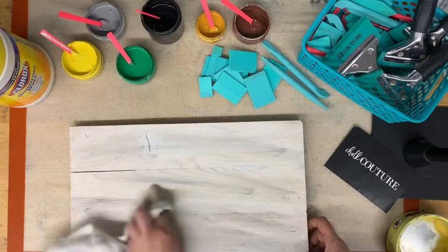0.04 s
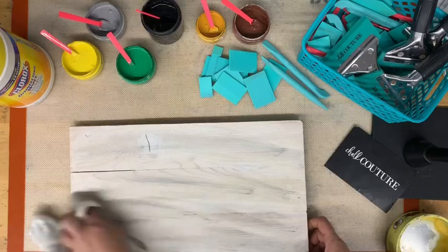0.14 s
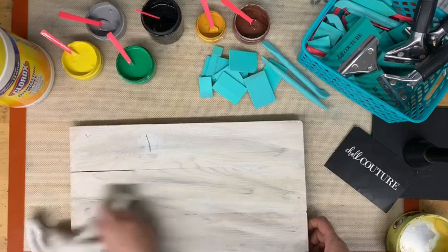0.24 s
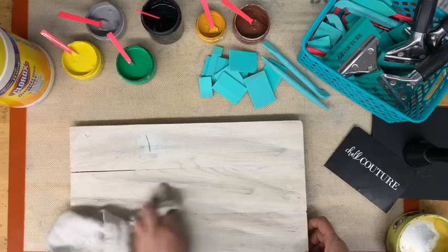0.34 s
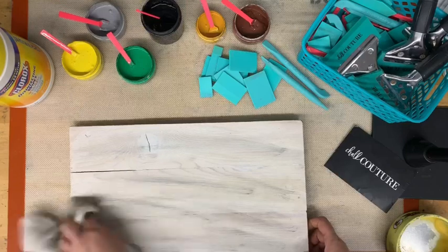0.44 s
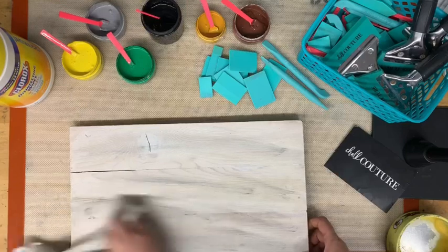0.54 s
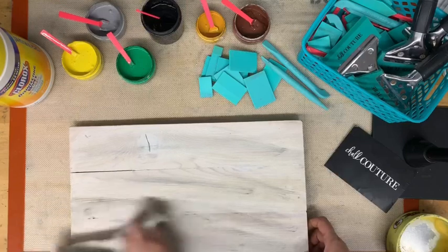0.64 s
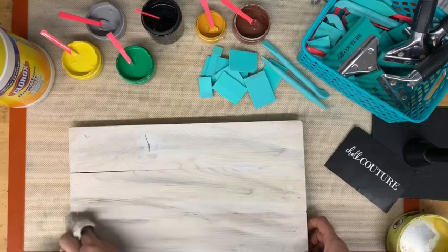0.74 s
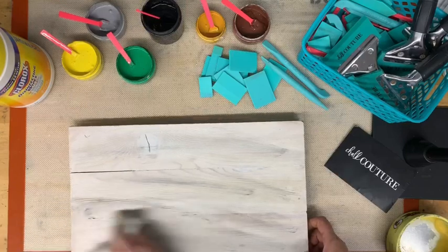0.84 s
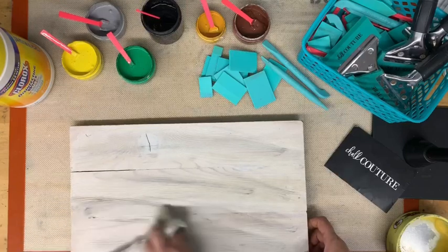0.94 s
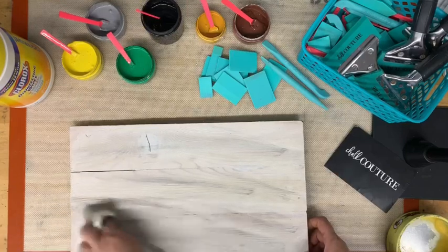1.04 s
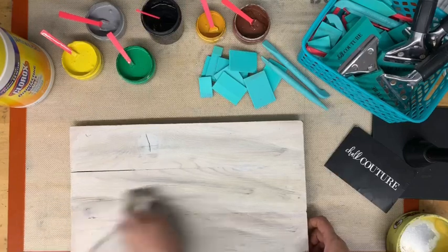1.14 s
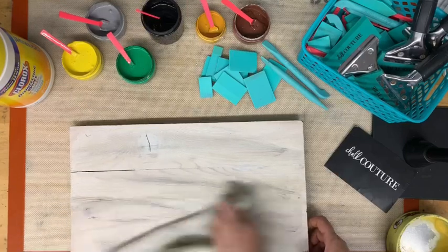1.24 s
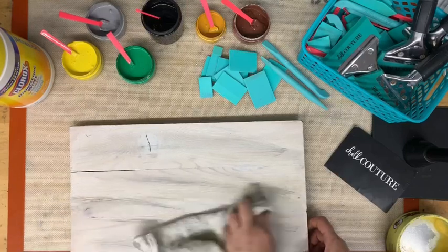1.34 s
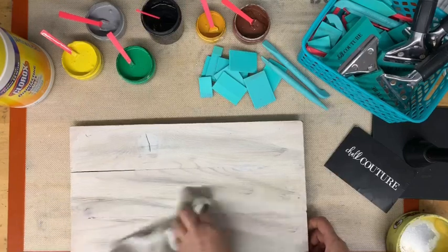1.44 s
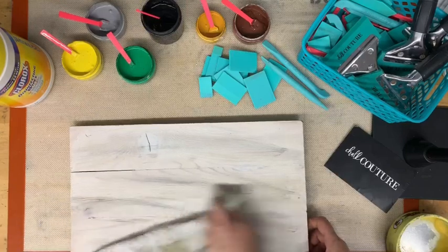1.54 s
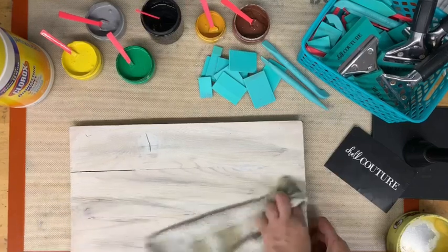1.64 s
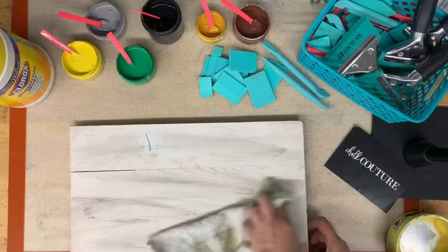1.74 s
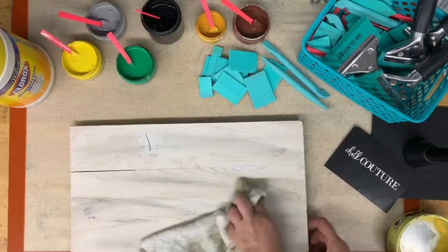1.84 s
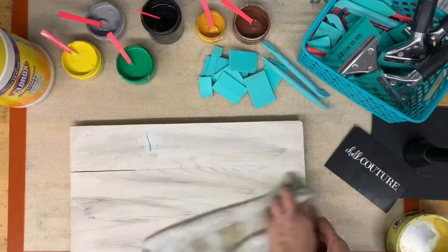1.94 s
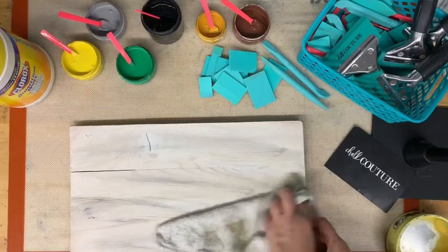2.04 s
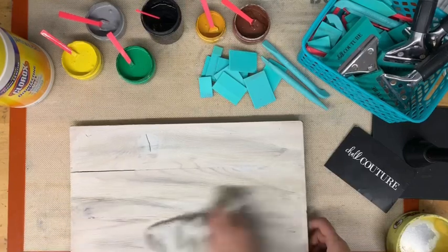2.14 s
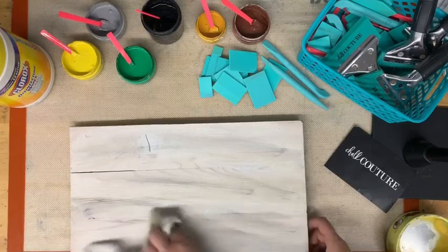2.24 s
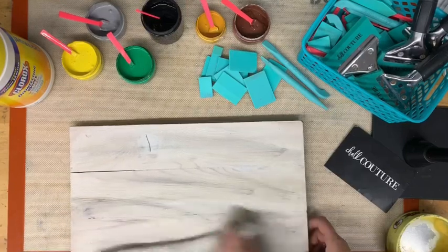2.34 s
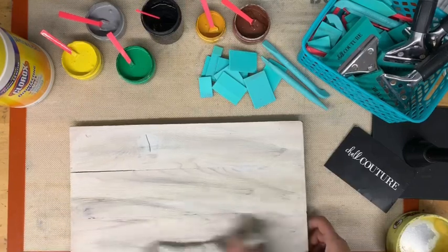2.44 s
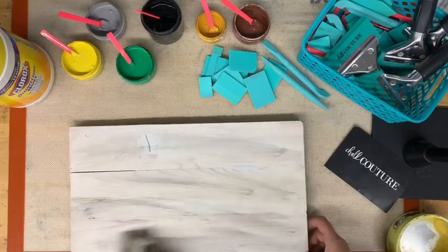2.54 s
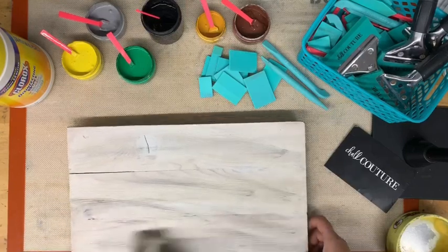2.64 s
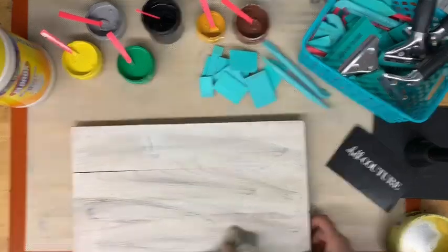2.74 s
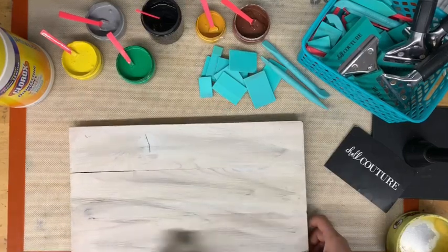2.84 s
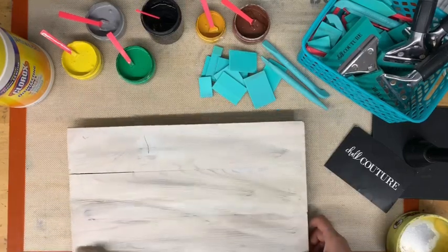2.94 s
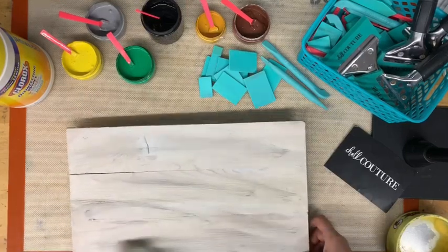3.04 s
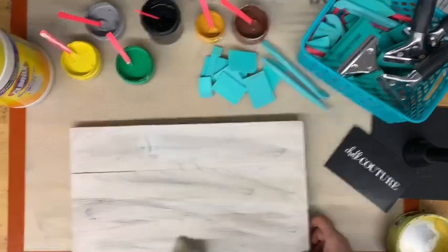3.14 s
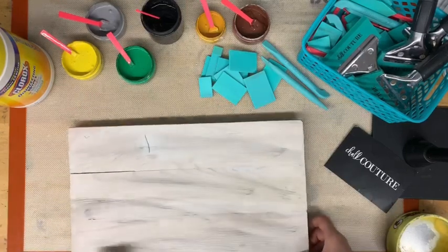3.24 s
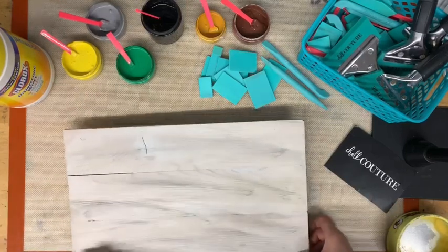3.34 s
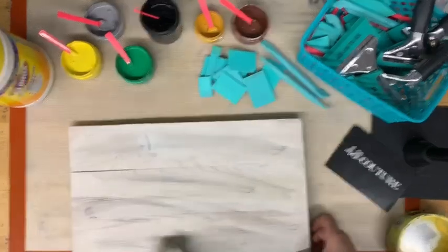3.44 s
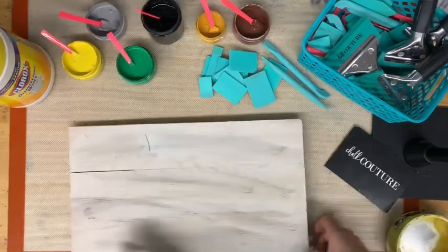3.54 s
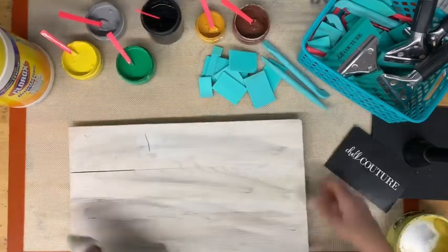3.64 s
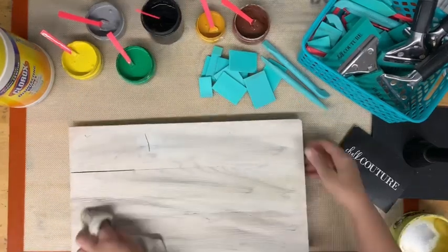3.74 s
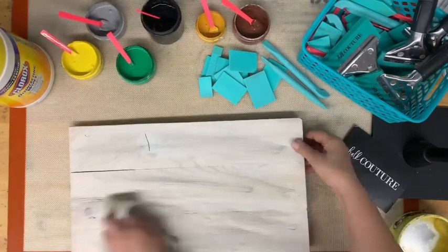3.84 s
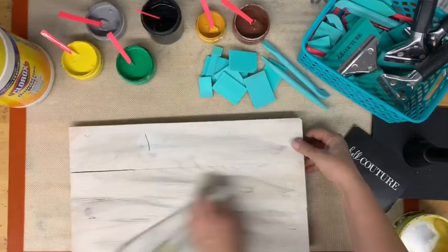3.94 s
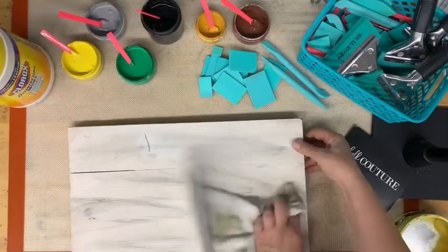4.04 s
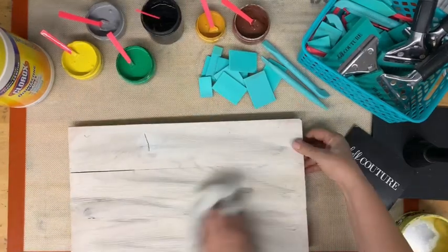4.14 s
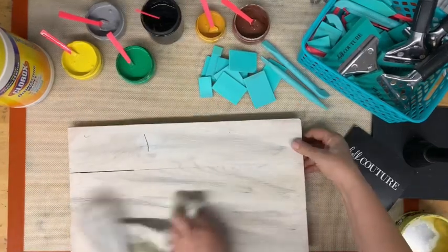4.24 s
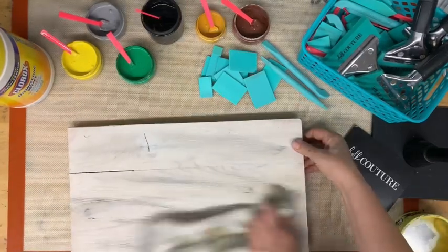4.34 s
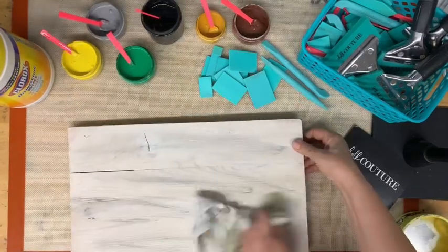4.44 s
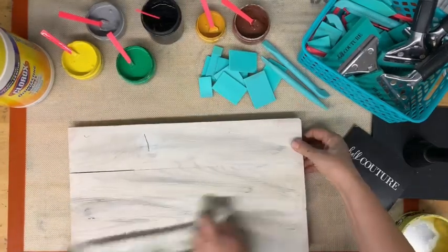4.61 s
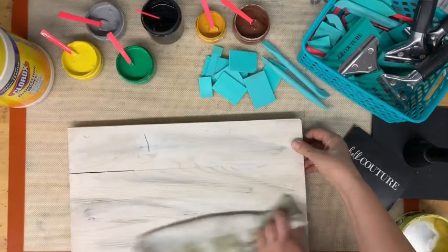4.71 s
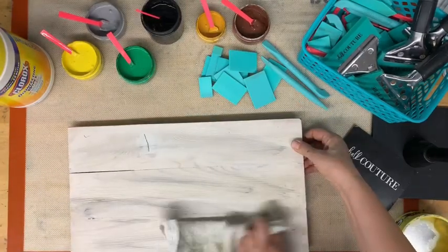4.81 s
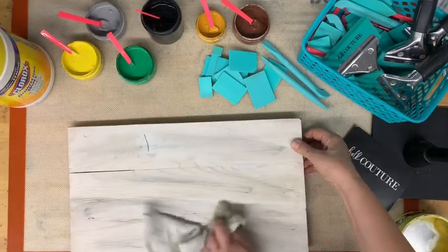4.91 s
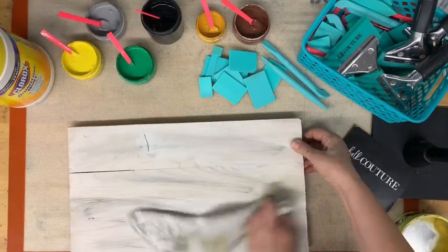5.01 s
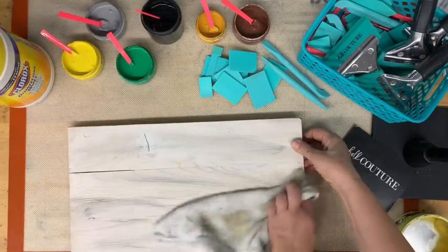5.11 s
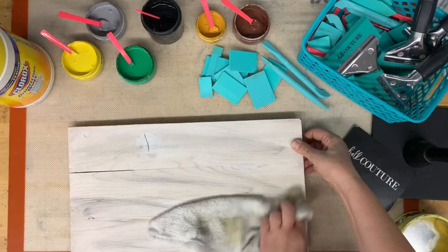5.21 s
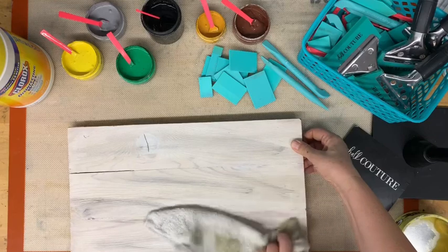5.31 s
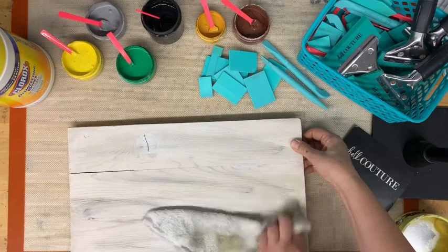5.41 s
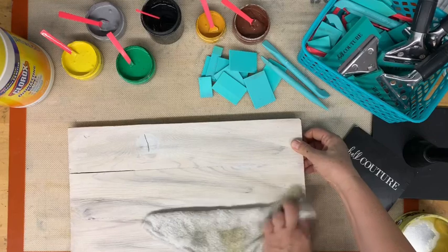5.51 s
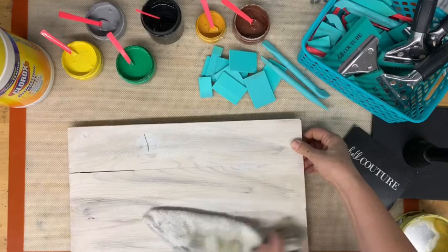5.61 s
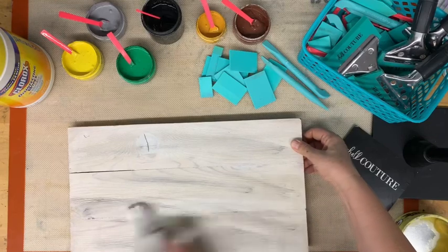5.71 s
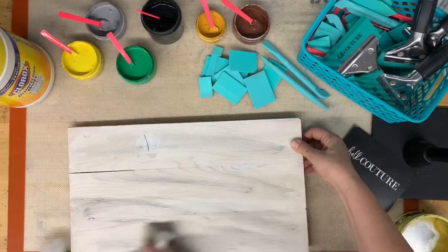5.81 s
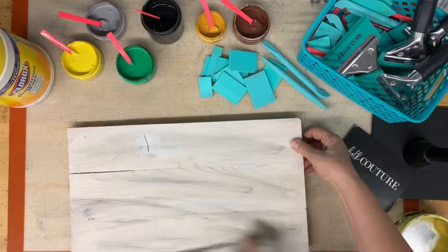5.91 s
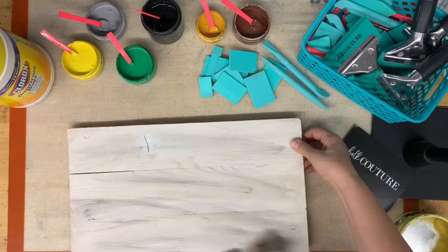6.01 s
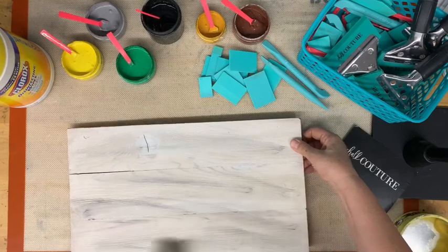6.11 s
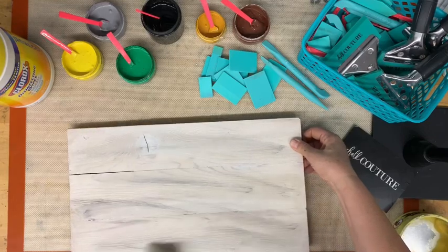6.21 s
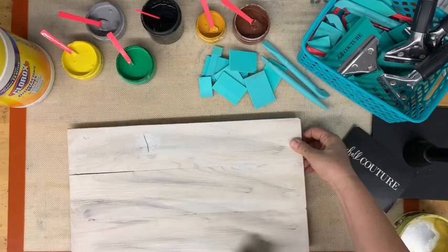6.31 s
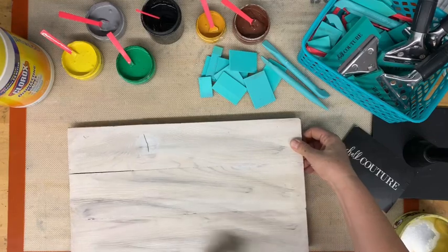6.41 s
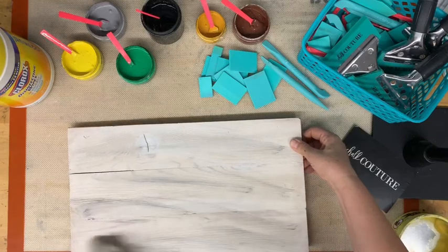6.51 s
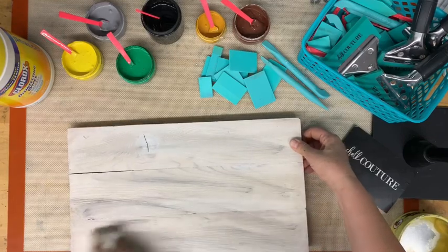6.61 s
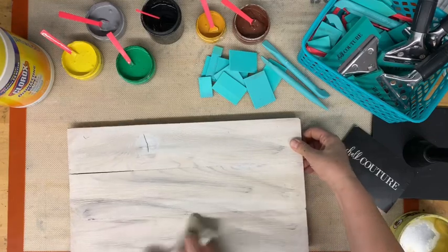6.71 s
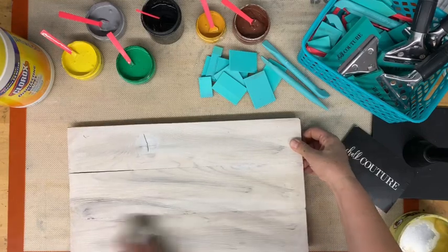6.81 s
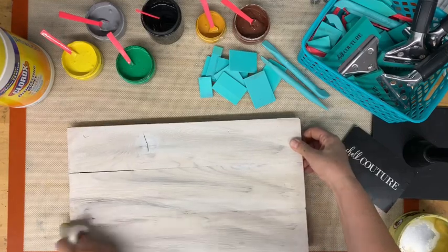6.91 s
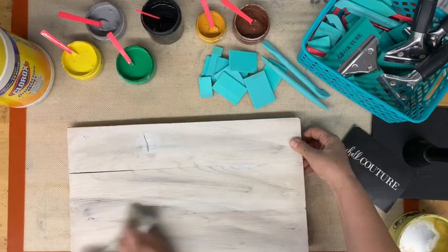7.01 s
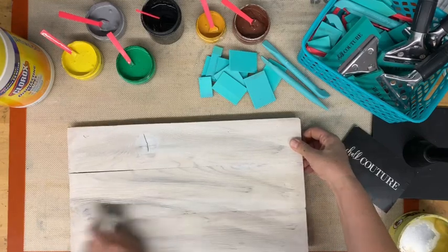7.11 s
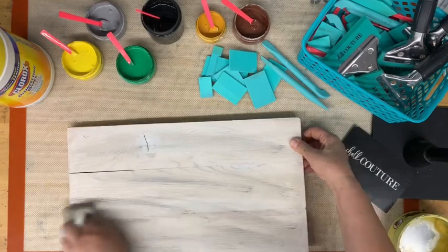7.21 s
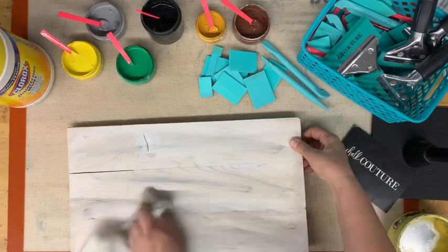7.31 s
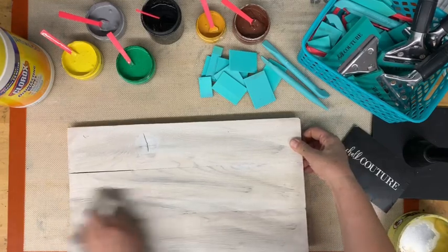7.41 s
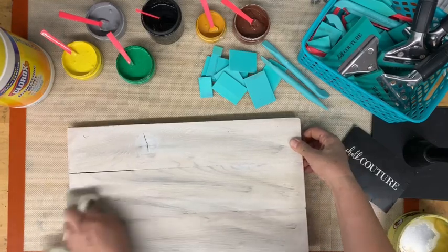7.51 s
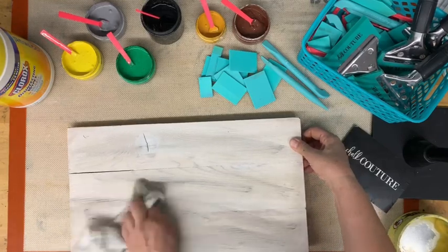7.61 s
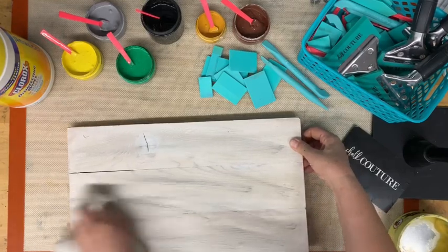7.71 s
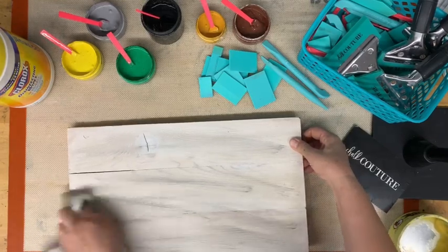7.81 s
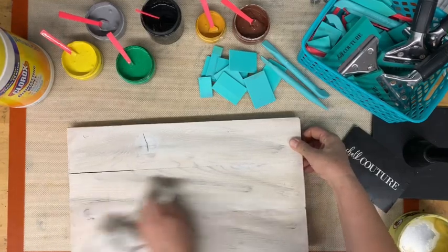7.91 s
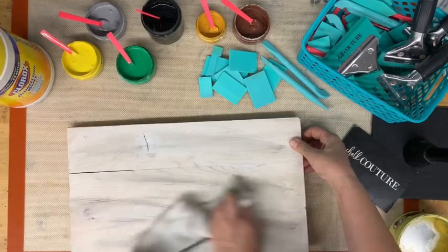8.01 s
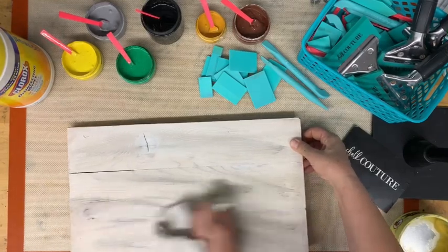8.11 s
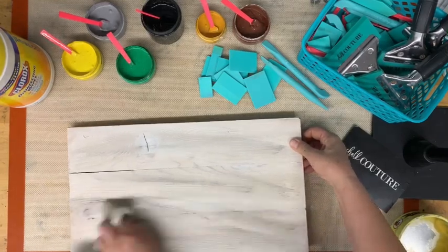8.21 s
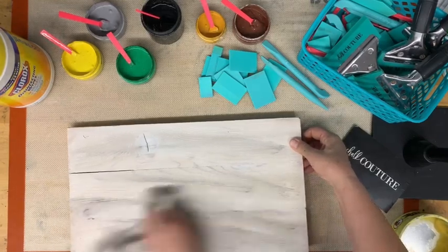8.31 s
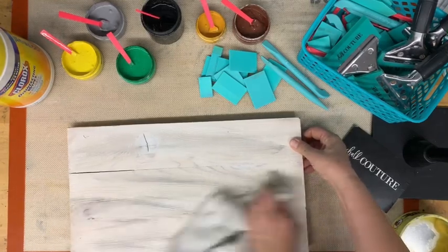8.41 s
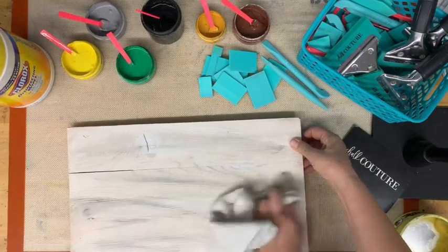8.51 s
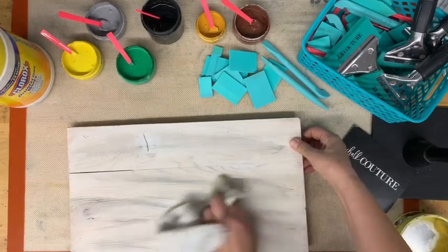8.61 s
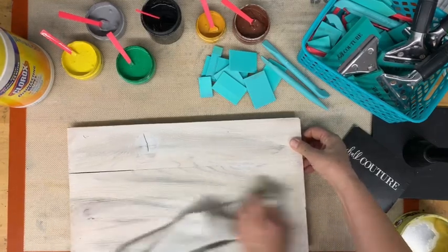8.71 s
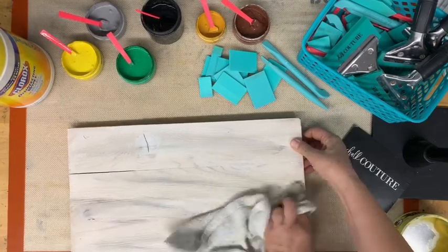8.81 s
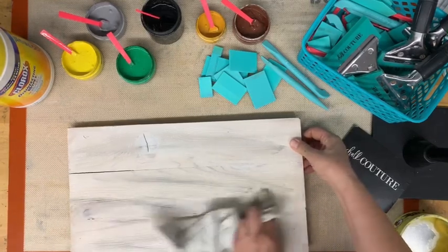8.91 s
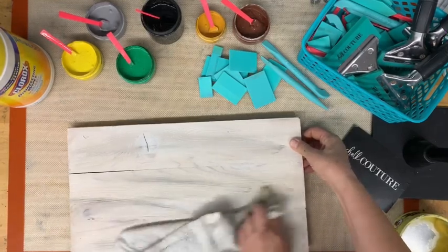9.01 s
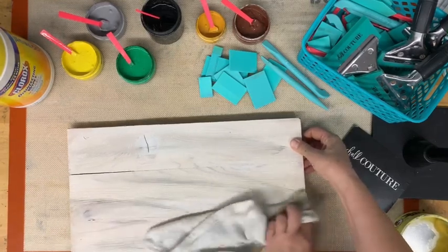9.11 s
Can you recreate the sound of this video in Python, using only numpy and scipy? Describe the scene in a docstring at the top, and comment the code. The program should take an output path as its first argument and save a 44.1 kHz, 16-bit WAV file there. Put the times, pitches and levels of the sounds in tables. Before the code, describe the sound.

Brisk, dry to-and-fro rubbing of cloth on wood, about six strokes a second, broken by three hard board knocks and scattered soft thumps.

```python
"""Waxy cloth scrubs to and fro on a painted board, about six strokes a second, over soft thumps and three loud knocks.
Hand speed drives fibre hiss; speed and pressure drive wood rasp, with singing modes and tiny catches.
Each landing of the board on the craft table sums a slap, noise bands, low thuds and damped modes.
Bumps, grips, rough bursts and skin slides are short shaped noises or rings; rumble, whirr and hum lie beneath.
Two closely spaced microphones overhead get direct sound, table echoes and, for the knocks, a small room."""
import sys
import numpy as np
from scipy import signal
from scipy.fft import rfft, irfft, next_fast_len
from scipy.io import wavfile
from scipy.ndimage import uniform_filter1d, map_coordinates

SR = 44100
rng = np.random.default_rng(int(sys.argv[2]) if len(sys.argv) > 2 else 0)


def persist_wave(psi):
    """Save psi, clipped to +-1, as 16-bit WAV."""
    counts = np.round(np.clip(psi, -1, 1) * 32767).astype(np.int16)
    wavfile.write(sys.argv[1], SR, np.atleast_2d(counts).T)


N = 403515

# cloth strokes, each lasting until the next: (start [s], relative fibre hiss [dB], relative wood rasp [dB],
# bite: rasp lift above 1 kHz [dB], pressure rise through stroke [dB], lean [-1..1, positive = fastest early])
STROKE_TABLE = [(-0.07, -45, -42.5, -4, -2, 0.054), (0.082, -44, -44.5, -1.5, 1, -0.29),
                (0.232, -42.5, -44, 0, 9, 0.49), (0.386, -43.5, -45.5, -4, 2, 0.063),
                (0.522, -44, -45.5, 1, 3, 0.15), (0.669, -42, -45, -6, -3, -0.33),
                (0.81, -42, -47.5, 3.5, 1, 0.2), (0.986, -48.5, -54.5, 10, -1, -0.12),
                (1.122, -45, -46, 0.5, -2.5, 0.4), (1.379, -49.5, -48.5, 1.5, 4, 0.23),
                (1.525, -47.5, -47.5, -4.5, -3, 0.13), (1.741, -52, -51.5, -2.5, 3, 0.22),
                (1.891, -48.0, -48.5, -8, 11, 0.55), (2.07, -48, -48.5, 0, 13, -0.16),
                (2.292, -45, -46, -0.5, 4, -0.063), (2.463, -41, -44.5, -2.5, 8, 0.2),
                (2.647, -43, -45, 2.5, 0, -0.16), (2.823, -42.0, -46.5, 4.5, 10, 0.41),
                (3.024, -45, -45, 3.5, 6, 0.28), (3.206, -43.5, -46.5, 6, 11, 0.44),
                (3.373, -47.5, -45, 0.5, -1, 0.06), (3.571, -84, -63, 1, -13, 0.0),
                (3.655, -74, -60, -7, 3, 0.54), (3.77, -71, -56, -7, 10, -0.62),
                (3.818, -42, -45, 3.5, 7, 0.56), (4.114, -45.5, -46.5, 3.5, 1, 0.28),
                (4.279, -44, -45, 2, -3, 0.067), (4.457, -44.5, -46, -2.5, 7, 0.39),
                (4.627, -45, -47, 3, -1.5, 0.2), (4.812, -48.5, -47.5, -6, 6, 0.068),
                (4.968, -46, -47, 1.5, 4, 0.52), (5.195, -45.5, -45.5, 4, -1, 0.6),
                (5.41, -45.5, -42.5, -2.5, -1, 0.17), (5.537, -42.5, -45.5, 4, -6.5, -0.24),
                (5.84, -39.5, -46, 4.5, -2, 0.13), (6.032, -42, -48.5, 5.5, 4, -0.29),
                (6.227, -43, -48, 7.5, 7, 0.45), (6.414, -40.0, -44, -0.5, -2, 0.057),
                (6.633, -40.5, -46, 4, -1, 0.4), (6.798, -38.5, -43.5, 0.0, 11, 0.26),
                (6.97, -42, -44.5, 4.5, 5, 0.36), (7.105, -43.5, -44, 0, 15, 0.36),
                (7.26, -42.5, -44.5, 3, 2, 0.4), (7.4, -44, -46.5, -2.5, 4, 0.15),
                (7.549, -42.5, -44, -1, 3, 0.56), (7.702, -41.5, -42.5, -4, 10, 0.5),
                (7.847, -42.5, -44.5, 2, 3, 0.63), (8.119, -44, -44, -4, 0, -0.26),
                (8.3, -41, -43, 1, -4, 0.26), (8.535, -49.5, -50, 0, 3, -0.13),
                (8.702, -45.5, -45, -1, 8, 0.46), (8.868, -50, -48, -13, -4, 0.026),
                (9.026, -47.5, -49, 4, 8, -0.19)]
LAST_TURN_S = 9.2
TOP_HZ = 15800  # band limit


def amp(db):
    """Decibels to gain."""
    return 10 ** (np.asarray(db) / 20)


def unit(x):
    """Scale to rms 1."""
    return x / np.sqrt(np.mean(x ** 2) + 1e-20)


def along(points, hz):
    """(Hz, value) points read on a log-frequency axis."""
    f, v = np.transpose(points)
    return np.interp(np.log(hz + 1), np.log(f + 1), v)


def wobble(rate_hz):
    """Smooth random curve with rate_hz knots a second."""
    knots = rng.standard_normal(int(N * rate_hz / SR) + 4)
    return map_coordinates(knots, [np.arange(N) * rate_hz / SR])


def filtered(x, response):
    """x times a complex response of frequency."""
    m = next_fast_len(N + SR // 2)
    return irfft(rfft(x, m) * response(np.fft.rfftfreq(m, 1 / SR)), m)[..., :N]


def coloured(x, spectrum):
    """x shaped by a spectrum, at rms 1."""
    return unit(filtered(x, lambda hz: amp(along(spectrum, hz))))


def passed(x, edge_hz, kind, order):
    """Causal low-, high- or band-pass."""
    return signal.sosfilt(signal.butter(order, edge_hz, kind, fs=SR, output="sos"), x)


def noise_band(size, low_hz, high_hz, order=2):
    """Band-passed noise at rms 1."""
    return unit(passed(rng.standard_normal(size), [low_hz, high_hz], "bandpass", order))


def add(track, s, sound):
    """Mix a sound into a track at time s."""
    part = track[round(s * SR):][:len(sound)]
    part += sound[:len(part)]


USUAL_DB = -43  # hiss reference for stroke strength


def hand():
    """Speed 0-1 rises and falls each stroke; also strength and turn level re usual, pressure and bite [dB]."""
    carry = 0.51  # share of strength gliding on from stroke to stroke
    fullness = 1.04  # flattening of the speed peak
    start, hiss_db, rasp_db, bite_db, push_db, lean = np.transpose(STROKE_TABLE)
    turns, over_db = np.append(start, LAST_TURN_S), hiss_db - USUAL_DB
    place = np.interp(np.arange(N) / SR, turns, np.arange(len(turns)))
    k = np.minimum(place.astype(int), len(start) - 1)
    u = place % 1  # progress through the stroke
    phase = u + np.clip(lean[k], -1, 1) * u * (1 - u)
    speed = np.abs(np.sin(np.pi * phase))
    speed = np.tanh(fullness * speed) / np.tanh(fullness)
    glide_db = np.interp(place, np.arange(len(start)) + .5, over_db)
    strength_db = over_db[k] + carry * (glide_db - over_db[k])
    pressure_db = rasp_db[k] + push_db[k] * (u - .5)
    return speed, strength_db, glide_db, pressure_db, bite_db[k]


def friction(grain_db, patchy_db):
    """Countless fibres slip in tiny clumps; the colour drifts at random in patches of time and frequency."""
    slips = rng.standard_normal(N) * amp(grain_db * wobble(1100))
    z = signal.stft(slips, nperseg=1024)[2]
    field = uniform_filter1d(rng.standard_normal(z.shape), 7, 0)
    field = uniform_filter1d(field, 6, 1)
    return unit(signal.istft(z * amp(patchy_db * unit(field)), nperseg=1024)[1][:N])


def board_ring(scatter_db, damped_s, blur_hz, size=SR // 3):
    """Board modes after one blow, hand-damped and blurred by a loose seat; low ones take longer to build up."""
    # board on its table: (mode [Hz], relative level [dB], t60 before hand damping [s])
    board_modes = [(65, -27.5, 0.31), (104.7, -28.5, 0.26), (212, -33.5, 0.14), (259.4, -21.5, 0.17),
                   (279.6, -31, 0.71), (328.3, -19.5, 0.41), (351, -21, 0.11), (375, -14, 0.15),
                   (390, -32, 0.3), (431, -16, 0.11), (470, -27, 0.09), (524, -21.5, 0.13),
                   (561, -30, 0.17), (673, -11.5, 0.13), (775, -25.5, 0.11), (792, -23, 0.16),
                   (897, -32, 0.32), (928, -25.5, 0.17), (1056, -22, 0.15), (1293, -26.5, 0.13),
                   (1392, -29, 0.25), (1520, -30, 0.1), (1749, -22, 0.2), (1945, -23.5, 0.17)]
    t = np.arange(size) / SR
    ring = np.zeros(size)
    for hz, db, t60_s in board_modes:
        build_up = 1 - np.exp(-t * hz / 0.25)
        wander = np.cumsum(rng.standard_normal(size)) * np.sqrt(abs(blur_hz) / (2 * np.pi * SR))
        decay = amp(db + scatter_db * rng.normal() - 60 * t / t60_s)
        ring += decay * build_up * np.sin(2 * np.pi * (hz * t + wander + rng.random()))
    return ring * amp(-60 * t / damped_s)


def singing():
    """Uneven wax slips ring the board; each stroke rubs another spot and so favours other modes."""
    slips, track = rng.standard_normal(N) * amp(2.96 * wobble(260)), np.zeros(N)
    turns = [max(row[0], 0) for row in STROKE_TABLE] + [LAST_TURN_S]
    for start, end in zip(turns, turns[1:]):
        ring = board_ring(scatter_db=2.0, damped_s=0.32, blur_hz=10.6, size=SR // 12)
        ring = passed(ring, 713, "highpass", order=5)
        stroke_slips = slips[round(start * SR):round(end * SR)]
        add(track, start, signal.fftconvolve(stroke_slips, ring / np.linalg.norm(ring)))
    return unit(passed(track, 1400, "lowpass", order=2))


def catches(speed):
    """Threads catch on the grain and snap free: small sharp scratches, more of them at speed."""
    full_speed_rate_hz, life_s = 110, 0.0016
    struck = rng.random(N) < full_speed_rate_hz * speed / SR
    snaps = struck * amp(2.5 * np.minimum(rng.exponential(size=N), 2))
    life = signal.lfilter([1], [1, -np.exp(-1 / (life_s * SR))], snaps)
    return unit(passed(life * rng.standard_normal(N), [750, 4000], "bandpass", order=2))


def scrubbing():
    """The hand's speed drives the fibres' hiss; speed and pressure drive the rasp of the wood."""
    # fibre spectrum: (frequency [Hz], relative density [dB per Hz])
    hiss_spectrum = [(200, -16.5), (1000, -8), (2400, -8), (3100, -1), (4300, 0), (5300, 0.5), (6700, 0),
                     (7600, -2.5), (8400, -3.5), (9400, -2), (12000, -2), (15500, -6)]
    # wood spectrum: (frequency [Hz], relative density [dB per Hz])
    rasp_spectrum = [(80, -43), (250, -15), (480, -14.5), (590, -6.5), (675, 1), (735, -7.5), (840, 2.5),
                     (1000, -11), (1100, -5.5), (1550, -11.5), (1930, -3), (2400, -14), (4200, -11),
                     (12000, -85)]
    # turns with a full stop: time [s]
    rests_s = [1.379, 1.741, 1.893, 2.07, 5.195, 5.408]
    rest_db, rest_half_s = -6.5, 0.045  # hiss drop at a full stop
    creep_db, creep_growth = -51.5, 0.64  # turn hiss; dB gained per dB of adjoining strokes
    speed, strength_db, turn_db, pressure_db, bite_db = hand()
    t = np.arange(N) / SR
    resting = sum(np.exp(-((t - s) / rest_half_s) ** 2) for s in rests_s)
    # at most turns the cloth keeps creeping
    creep = amp(creep_db + creep_growth * turn_db + rest_db * resting)
    drag = amp(0.65 * wobble(45))  # uneven wax grip
    fibres = coloured(friction(grain_db=1.3, patchy_db=1.7), hiss_spectrum)
    # the top opens only once the cloth slides freely
    dull = filtered(fibres, lambda hz: 1 / (1 + (hz / 6000) ** 2))
    sliding = speed ** 2 / (speed ** 2 + 0.18 ** 2)
    hiss_gain = np.hypot(amp(USUAL_DB + strength_db + 0.83) * speed ** 1.35, creep)
    hiss = hiss_gain * (dull + sliding * (fibres - dull))
    rasp = amp(-1.85) * coloured(friction(grain_db=1.0, patchy_db=4.0), rasp_spectrum)
    upper = filtered(rasp, lambda hz: hz ** 8 / (hz ** 8 + 1000 ** 8))
    rasp = rasp + (amp(bite_db) - 1) * upper
    rasp = rasp + amp(-3.0) * singing() + amp(-9.5) * catches(speed)
    return drag * (hiss + amp(pressure_db) * speed ** 0.76 * rasp)


def background():
    """Room air with a heaving rumble, a narrow fan-like whirr and an unsteady mains hum."""
    # air common to both microphones: (frequency [Hz], relative density [dB per Hz])
    air_spectrum = [(20, 8), (45, 5), (70, 3.5), (115, 2.5), (160, -4.5), (450, -6.5), (580, -2),
                    (670, -10), (800, -8), (1300, -12.5), (1900, -9.5), (3000, -55), (15000, -76)]
    # air differing between them: (frequency [Hz], relative density [dB per Hz])
    draught_spectrum = [(60, -12), (300, -5), (670, 5), (1300, -4.5), (3000, -16), (15000, -86)]
    # low rumble ahead of its heaving: (time [s], level [dB])
    rumble_levels = [(0.3, -56), (1.1, -65), (3.0, -64), (4.2, -65), (6.3, -66), (7.0, -57), (7.5, -59.5),
                     (8.2, -64)]
    t = np.arange(N) / SR
    air = coloured(rng.standard_normal(N), air_spectrum)
    air = air + amp(-3.5) * coloured(rng.standard_normal((2, N)), draught_spectrum)
    rumble = noise_band(N, 22, 90) * amp(2.5 * wobble(2.67))
    rumble_db = np.interp(t, *np.transpose(rumble_levels))
    whirr = noise_band(N, 655, 685, order=1)
    hum = np.sin(2 * np.pi * 119.5 * t + .3 * wobble(5)) * amp(2.2 * wobble(9))
    return amp(-56.0) * air + amp(rumble_db) * rumble + amp(-59.5) * whirr + amp(-54.0) * hum


def bumps():
    """Knuckles tap through the cloth and ring the board briefly under the pressing hand."""
    # knuckle taps: (time [s], direct peak [dB], contact cut-off [Hz])
    taps = [(0.396, -37, 1200), (4.141, -33, 1000), (4.320, -33, 1870), (4.323, -28.5, 810),
            (4.347, -26, 720), (5.425, -35.5, 900), (6.753, -33, 1500), (6.817, -32, 900),
            (7.204, -32, 900), (7.278, -41, 1600)]
    track = np.zeros(N)
    for s, db, contact_hz in taps:
        ring = board_ring(scatter_db=4.0, damped_s=0.1, blur_hz=3.5, size=SR // 6)
        upper = passed(ring, 1.42 * contact_hz, "highpass", order=2)
        sound = passed(upper + amp(-17.5) * ring, contact_hz, "lowpass", order=4)
        add(track, s, amp(db) * sound / np.abs(sound).max())
    return track


def swell(s, db, half_s, low_hz, high_hz):
    """A band of rubbing that swells to db at time s and fades: (start, sound)."""
    t = np.arange(SR // 3) / SR - 1 / 6
    shape = np.exp(-(t / half_s) ** 2)
    edges_hz = [low_hz, min(high_hz, TOP_HZ)]
    rub = shape * passed(rng.standard_normal(len(t)), edges_hz, "bandpass", order=2)
    return s + t[0], amp(db) * rub * np.linalg.norm(shape) / np.linalg.norm(rub)


def grips():
    """Where the wax holds, the rasp swells around one pitch of the wood."""
    # wax grips: (height time [s], direct level [dB], centre [Hz], half-length [s])
    holds = [(0.886, -41.5, 690, 0.021), (0.888, -44, 1900, 0.018), (1.205, -49, 790, .05),
             (2.554, -51, 3180, 0.038), (2.934, -47, 1880, 0.014), (3.942, -49, 3160, .035),
             (5.266, -45, 670, 0.033), (5.293, -44.5, 1300, 0.046), (5.713, -50, 3870, .03),
             (5.766, -46.5, 935, 0.071), (5.954, -51, 1920, 0.036), (6.161, -46, 1900, 0.016),
             (6.319, -46.5, 1930, .045), (6.473, -45.5, 680, 0.021), (6.683, -50, 1890, .025),
             (6.924, -45, 1160, .018), (7.018, -38.5, 700, 0.015), (7.041, -51, 2860, 0.022),
             (7.206, -49, 685, 0.02), (7.508, -48, 950, .025), (7.623, -48, 2840, .025),
             (7.645, -44, 800, .018), (7.801, -39.5, 910, 0.02), (7.93, -48, 2900, 0.047),
             (7.975, -44.5, 816, 0.072), (7.984, -52, 1460, .04), (8.22, -43.5, 736, 0.031),
             (8.392, -39.5, 814, 0.043), (8.647, -47, 780, .02), (8.788, -46, 700, 0.023)]
    width_octaves = 0.3
    track, spread = np.zeros(N), 2 ** (width_octaves / 2)
    for s, db, centre_hz, half_s in holds:
        add(track, *swell(s, db, half_s, centre_hz / spread, centre_hz * spread))
    return track


def knocks():
    """A landing is a rounded slap, chatter, hollow thump, wood ring and low thuds as the board settles."""
    # board landings: (time [s], force [dB], contact cut-off [Hz, low = cushioned], hand-damping t60 [s])
    landings = [(0.985, -20, 360, .4), (1.409, -26, 290, 0.17), (1.673, -18, 294, 0.23),
                (1.847, -28, 110, .1), (1.958, -25.5, 260, 0.13), (2.129, -25, 130, .1),
                (2.205, -17, 336, 0.2), (2.217, -18, 340, 0.29), (2.483, -25, 220, .15),
                (2.7709, -0.5, 750, 0.3), (3.012, -21, 248, 0.16), (3.092, -15, 140, 0.1),
                (3.1424, 0, 1240, 0.36), (3.356, -28, 232, 0.15), (3.4723, -0.3, 1040, 1.3),
                (3.812, -16, 330, 0.18), (3.9, -29, 90, 0.084), (4.349, -32, 380, 0.14),
                (4.596, -28, 150, 0.15), (5.184, -26, 210, .15), (5.512, -31, 130, .1),
                (5.737, -19, 287, 0.13), (6.147, -25.5, 190, 0.13), (6.19, -33, 230, 0.12),
                (6.53, -21, 197, 0.11), (6.745, -29, 430, .12), (6.818, -26, 130, .1)]
    # table gives as the board hits, settles and rocks back:
    # (delay [s], frequency [Hz], relative level [dB], half-length [s])
    table_thuds = [(0.015, 101.3, -24.5, 0.013), (0.042, 85.5, -25, 0.0077), (0.083, 65, -41, 0.02)]
    slap_db, slap_growth = 0, 1.4  # slap over the rest; its dB per dB of force
    press = 0.31  # gentle landings push more than ring: extra depth, dB per dB less force
    rise_s = .004
    track, t = np.zeros(N), np.arange(SR // 3) / SR
    slap = np.exp(-((t - rise_s) / .0013) ** 2) * np.cos(2 * np.pi * 630 * (t - rise_s))
    for s, db, contact_hz, damped_s in landings:
        chatter = noise_band(len(t), 255, 450) * amp(-23 - 60 * t / 0.14)
        clatter = noise_band(len(t), 700, 1900) * amp(-21 - 60 * t / 0.21)
        thump = noise_band(len(t), 110, 290) * amp(-34.5 - 60 * t / 0.25)
        bloom = t / 0.022 * np.exp(1 - t / 0.025)  # the heavy table is slow to answer
        rumble = noise_band(len(t), 45, 110, order=3) * amp(-36.5) * bloom
        thud = np.zeros(len(t))
        for delay_s, hz, level_db, half_s in table_thuds:
            shape = amp(level_db) * np.exp(-((t - delay_s) / half_s) ** 2)
            thud += shape * np.sin(2 * np.pi * (hz * t + rng.random()))
        ring = board_ring(scatter_db=1.0, damped_s=damped_s, blur_hz=2.5)
        body = chatter + clatter + amp(-press * db) * (thump + thud + rumble)
        body = body * (1 - np.exp(-t / 0.0034)) + amp(0.5) * ring
        slap_gain = amp(slap_growth * db + slap_db)
        add(track, s - rise_s, slap_gain * passed(slap, contact_hz, "lowpass", order=4))
        add(track, s, amp(db) * passed(body, contact_hz, "lowpass", order=4))
    return track


def rough_bursts():
    """Short rough band-limited bursts with a brief wooden ring, some just ahead of the loud knocks."""
    # rough bursts: (time [s], direct peak [dB], centre [Hz], length [s])
    bursts = [(2.199, -37, 750, .015), (2.764, -19.5, 600, 0.0056), (3.13, -17.5, 1110, 0.01),
              (3.456, -27, 1500, 0.0063), (3.462, -16.5, 704, 0.0034), (3.787, -39.5, 890, 0.0081),
              (6.819, -41, 710, 0.0091), (6.99, -35.5, 1000, 0.0035), (7.276, -28.5, 1300, 0.0046)]
    track, t = np.zeros(N), np.arange(SR // 6) / SR
    for s, db, centre_hz, length_s in bursts:
        burst = rng.standard_normal(len(t)) * t / length_s * np.exp(-2 * t / length_s)
        ring = board_ring(scatter_db=1, damped_s=0.09, blur_hz=11, size=len(t))
        upper = passed(ring, 636, "highpass", order=6)
        rung = signal.fftconvolve(burst, upper)[:len(t)]
        sound = unit(burst) + amp(-4.0) * unit(rung)
        sound = passed(sound, [centre_hz / 2.04, centre_hz * 1.5], "bandpass", order=2)
        add(track, s, amp(db) * sound / np.abs(sound).max())
    return track


def slides():
    """Skin whispers over the paint as the holding hand slides off the board's edge."""
    # skin slides: (height time [s], direct level [dB], half-length [s])
    skin_slides = [(3.7, -63.5, .04), (3.716, -54.5, 0.012)]
    track = np.zeros(N)
    for s, db, half_s in skin_slides:
        add(track, *swell(s, db, half_s, low_hz=4000, high_hz=7750))
    return track


def table_echoes(x):
    """Jars, basket and table top scatter sound to each microphone; paths change as the hand moves."""
    # share sent back: (frequency [Hz], relative level [dB])
    scatter_spectrum = [(60, -22), (250, -10), (800, -5), (1500, -6), (2700, -1), (3700, -5), (5000, -13),
                        (15000, -15)]
    t, hop = np.arange(SR // 30) / SR, SR // 12
    pair, padded = np.zeros((2, N + hop)), np.pad(x, (hop, 2 * hop))
    window = np.sin(np.pi * np.arange(2 * hop) / (2 * hop))
    for start in range(0, N + hop, hop):
        for channel in pair:
            echoes = rng.standard_normal(len(t)) * amp(-60 * t / 0.11) * (t > .001)
            echoes = echoes / np.linalg.norm(echoes)
            piece = window * padded[start:start + 2 * hop]
            add(channel, start / SR, signal.fftconvolve(piece, echoes))
    return filtered(pair[:, hop:], lambda hz: amp(along(scatter_spectrum, hz)))


def microphones(x):
    """Direct treble reaches the left microphone a little sooner than the right."""
    # phase between microphones: (frequency [Hz], left lead [rad])
    left_lead = [(0, 0), (800, -.4), (1500, 0), (4000, 1.9), (4900, 3.14), (17500, 22)]
    halves = [.5j, -.5j]
    return filtered(x, lambda hz: np.exp(np.outer(halves, np.interp(hz, *np.transpose(left_lead)))))


def room(x):
    """The walls answer each microphone with a different decaying noise tail; bass lasts longest."""
    # reverberation: (frequency [Hz], t60 [s])
    room_decay = [(60, 0.86), (300, 0.3), (1000, 0.28), (4000, 0.057), (15000, 0.15)]
    hz, t, z = signal.stft(rng.standard_normal((2, SR // 2)), SR, nperseg=256)
    decay = amp(-60 * t / along(room_decay, hz)[:, None])
    tail = signal.istft(z * decay, SR, nperseg=256)[1]
    tail = np.pad(tail, ((0, 0), (200, 0))) / np.linalg.norm(tail[0])  # delay in samples
    left, right = signal.fftconvolve(x[None], tail, axes=1)[:, :N]
    # long waves reach both microphones alike
    side = passed(left - right, 560, "highpass", order=1)
    return np.array([left + right + side, left + right - side]) / 2


def scene():
    """Cloth and board, direct and off the table, over the background; only the knocks stir the room."""
    cloth = scrubbing() + grips() + rough_bursts() + bumps() + slides()
    wood = knocks()
    near = amp(-6) * table_echoes(cloth + .5 * wood)
    return microphones(cloth + wood) + near + room(amp(-14.5) * wood) + background()


def record(dry):
    """Round off the highest peaks and keep nothing above the band limit."""
    rounded = dry / (1 + np.abs(dry) ** 8) ** (1 / 8)
    return filtered(rounded, lambda hz: hz < TOP_HZ)


dry = scene()
out = record(dry)
persist_wave(out)
```